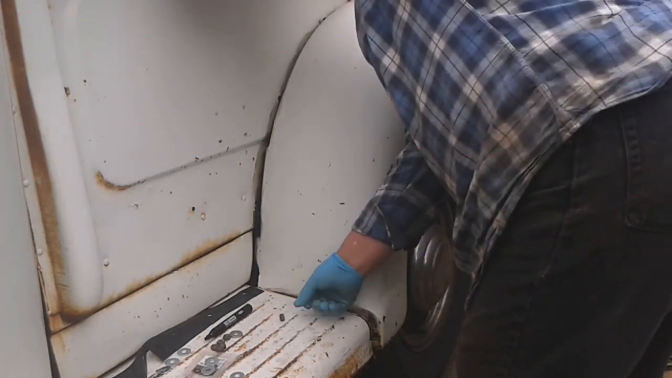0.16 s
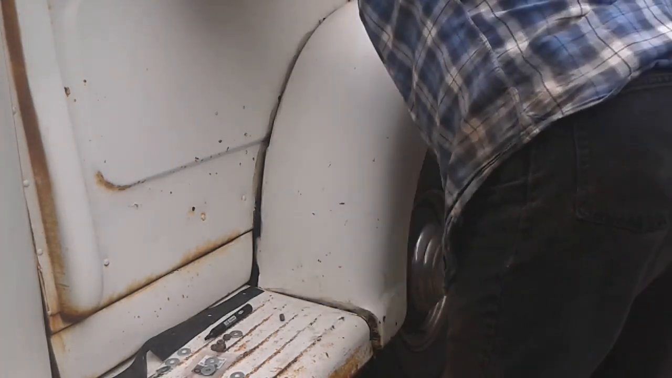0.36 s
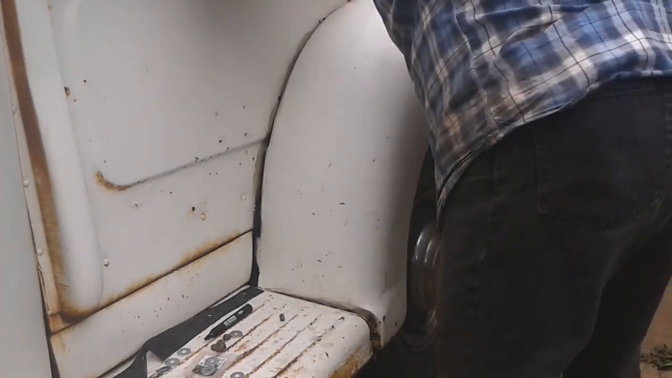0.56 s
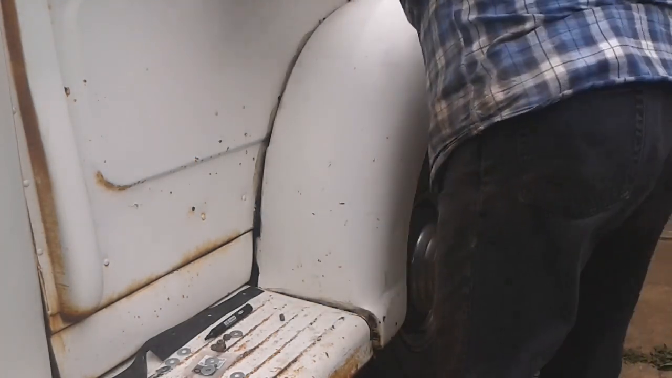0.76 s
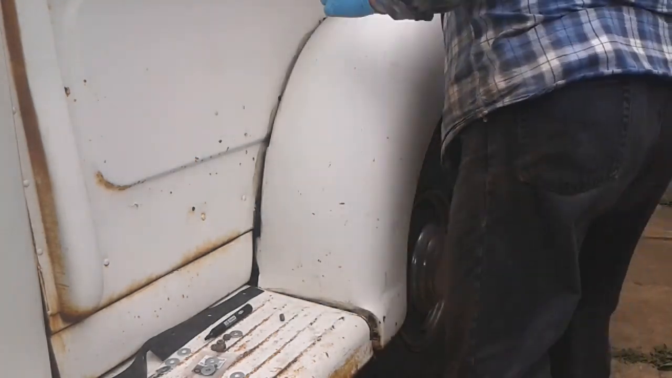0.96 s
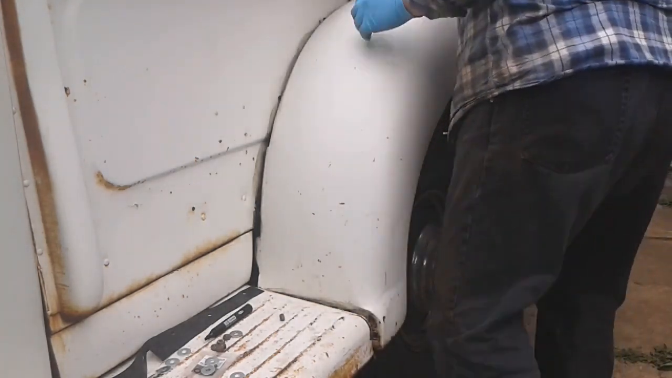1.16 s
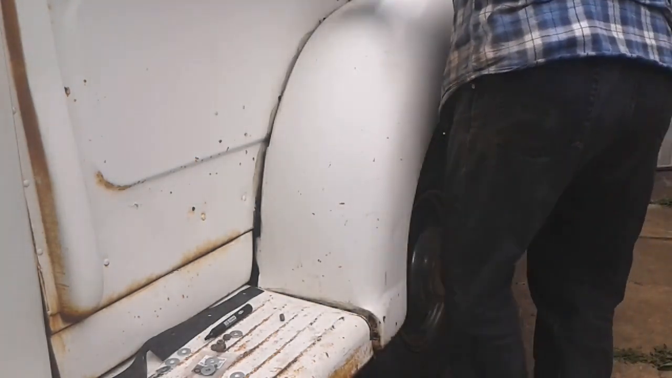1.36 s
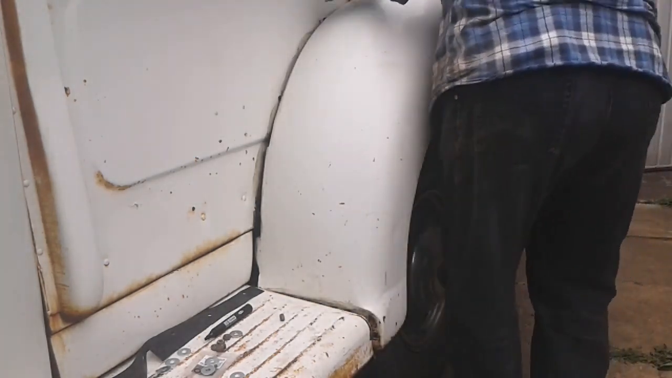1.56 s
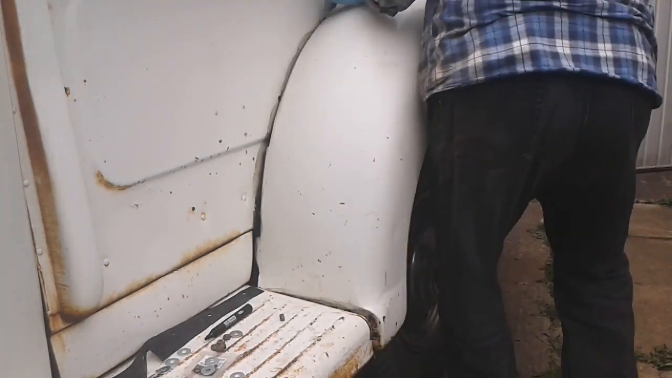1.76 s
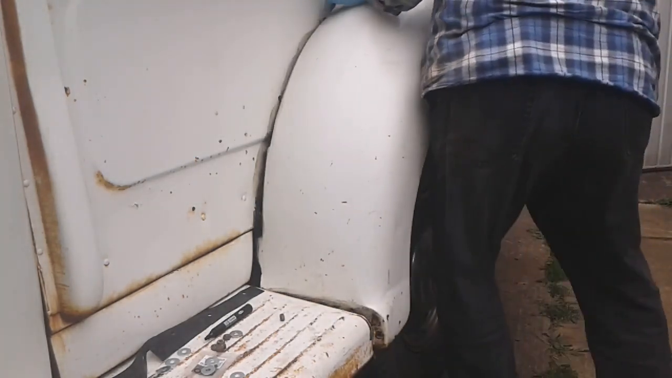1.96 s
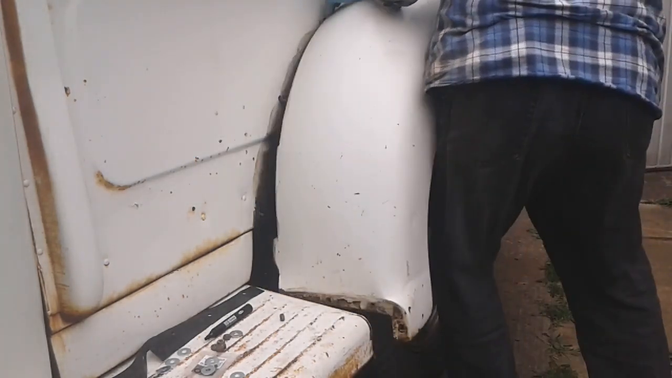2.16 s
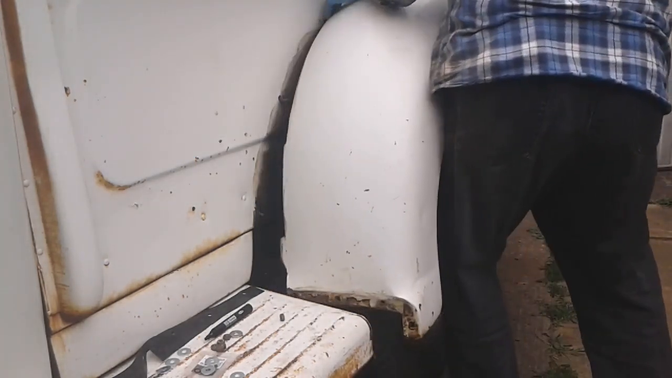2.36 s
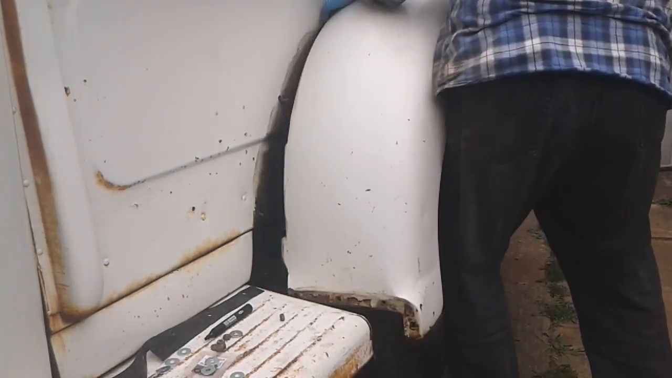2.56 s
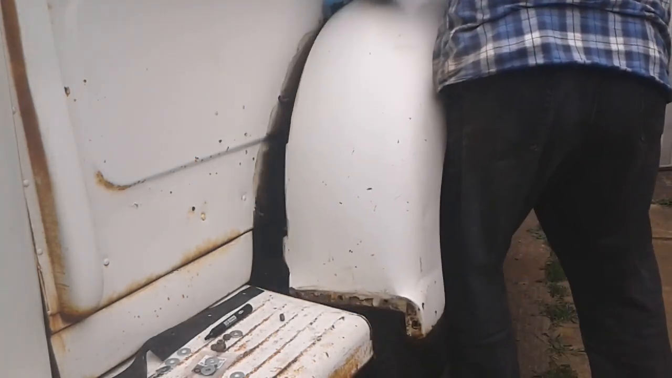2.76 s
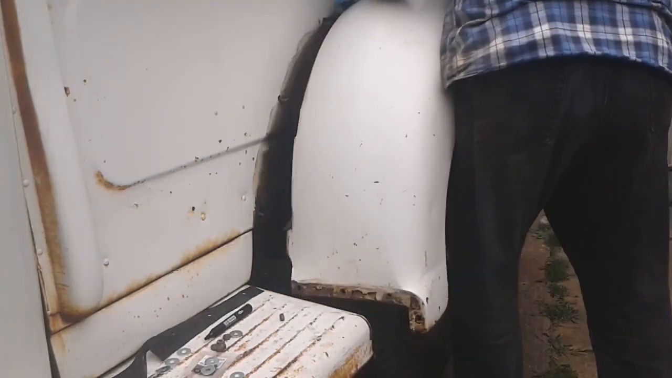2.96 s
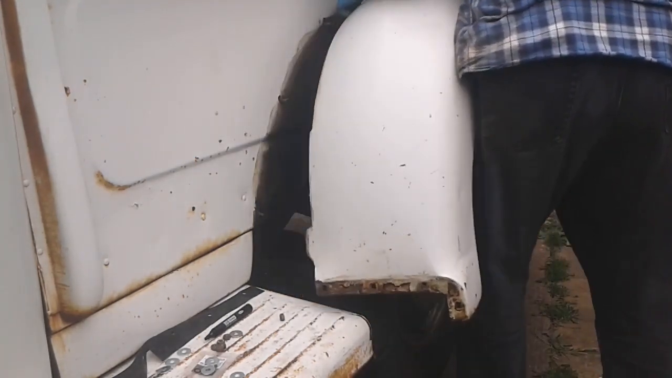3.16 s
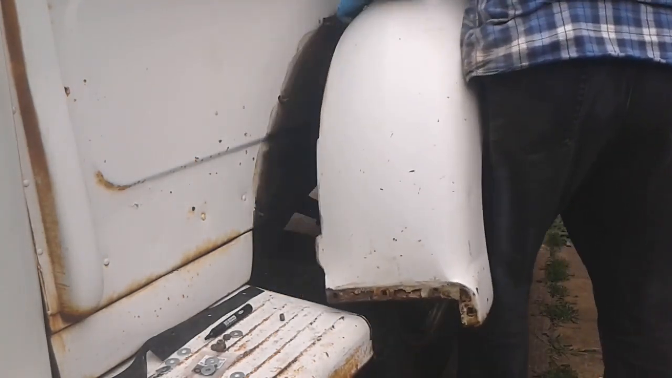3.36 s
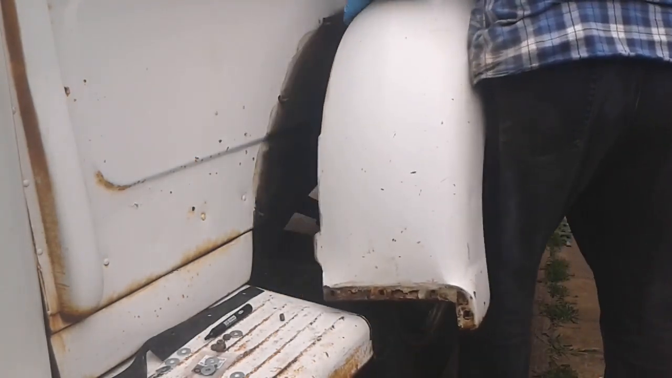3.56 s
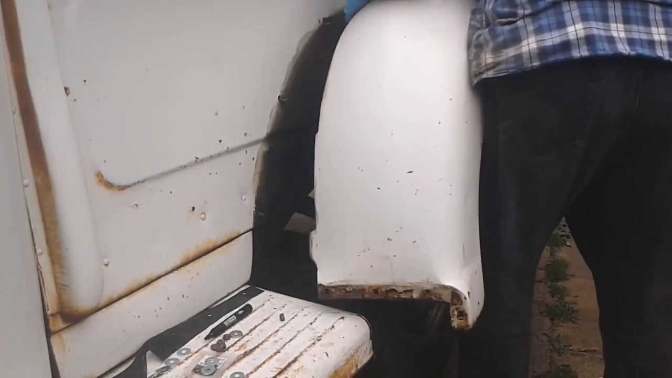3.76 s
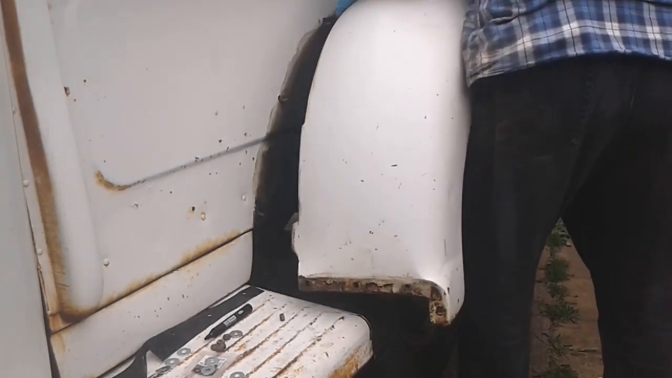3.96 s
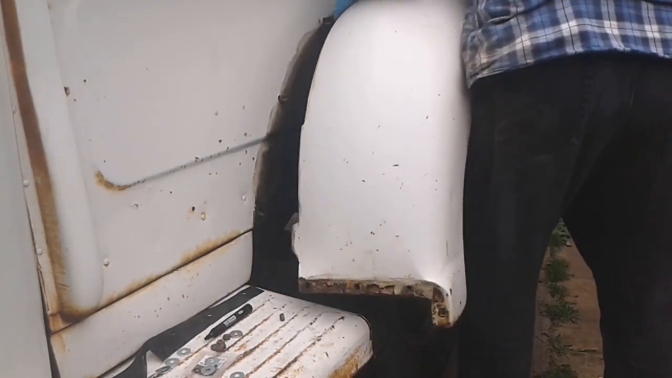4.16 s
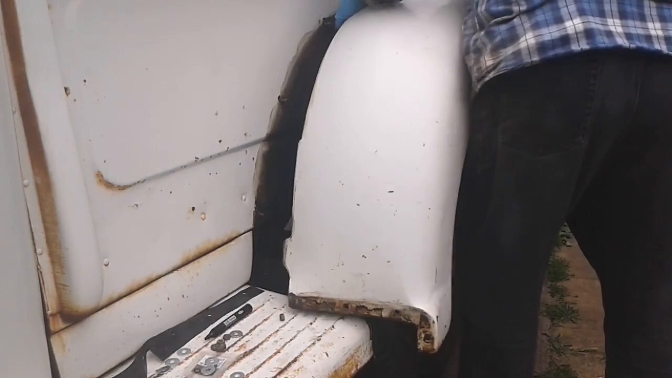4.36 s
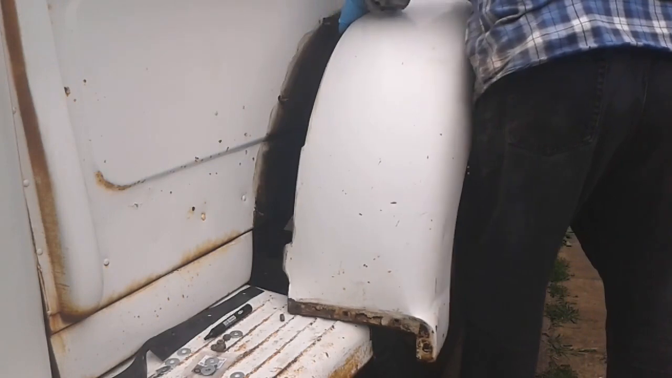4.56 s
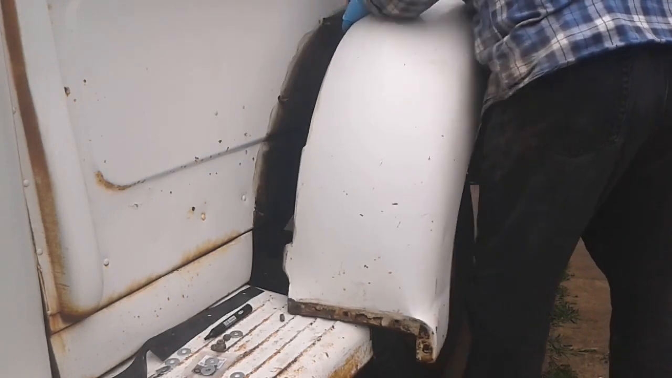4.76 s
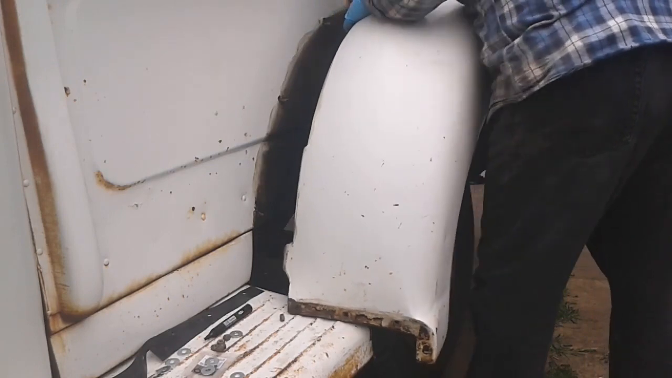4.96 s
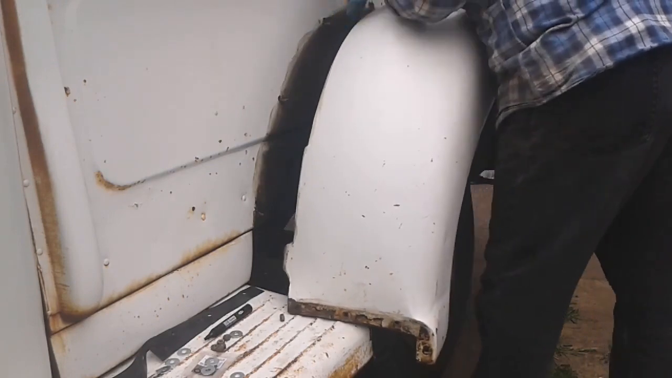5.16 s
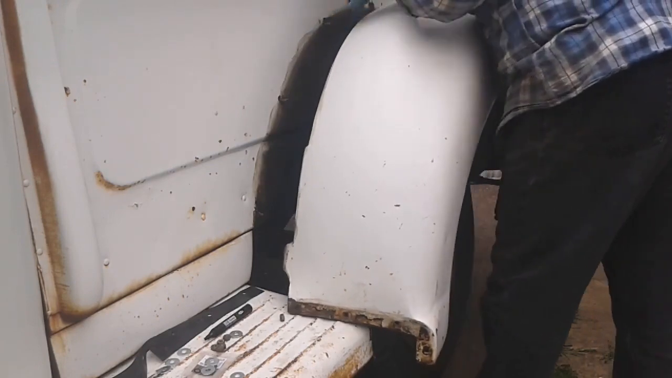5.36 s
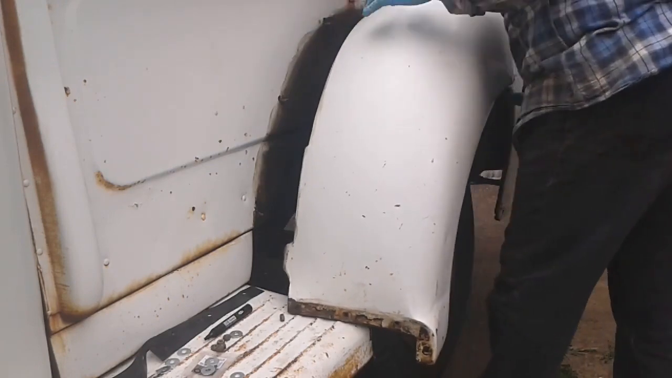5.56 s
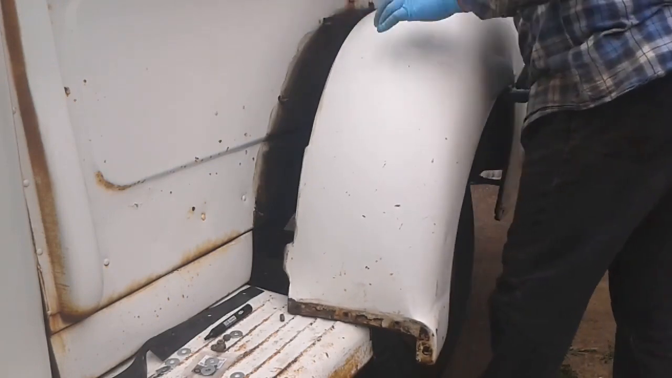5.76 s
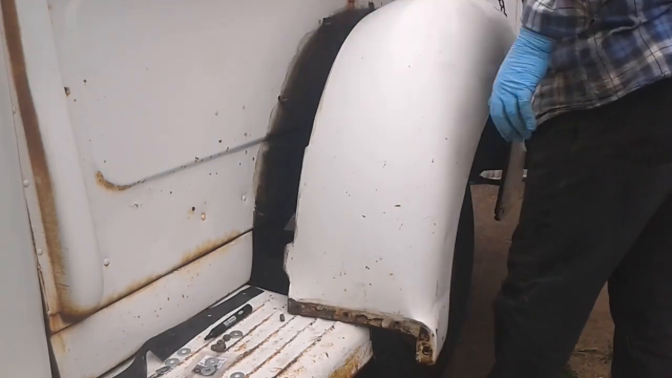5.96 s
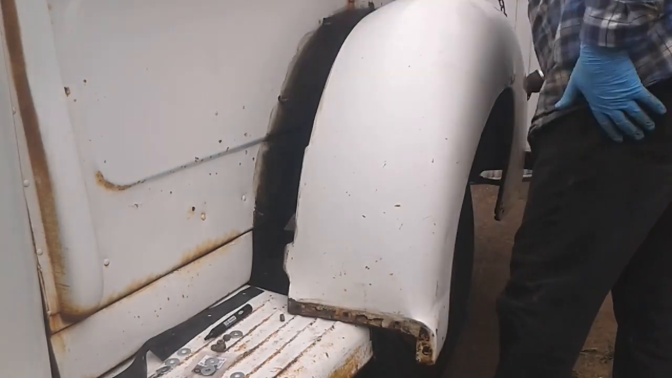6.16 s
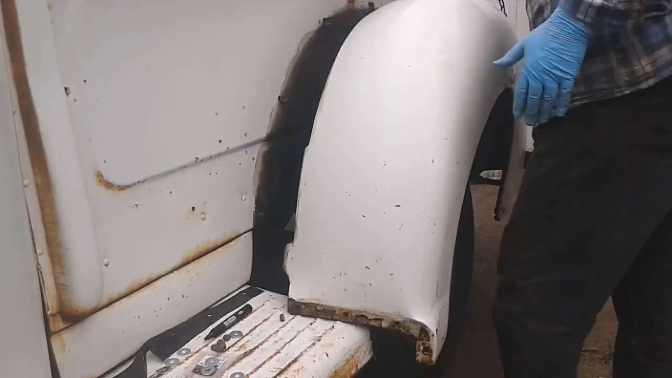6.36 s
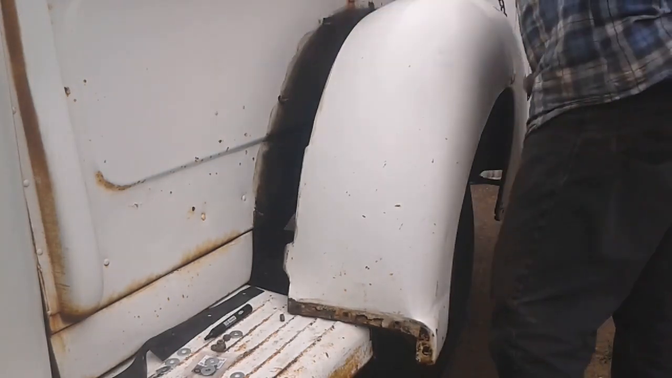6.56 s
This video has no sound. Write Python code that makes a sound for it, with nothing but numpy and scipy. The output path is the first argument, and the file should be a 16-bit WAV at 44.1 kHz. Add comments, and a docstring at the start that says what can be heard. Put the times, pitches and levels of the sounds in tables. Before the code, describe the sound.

Close microphone in a workshop with a faint diffuse echo, over a dull, gently swelling background, soft hiss and barely audible tones. A small metallic tick comes at the very start, then near quiet until about 1.9 s, when a steel edge gives low, nasal creaks. Scraping grows from 2.1 s into a hollow thump and rough groan at 2.2 s; short falling squeaks follow from 2.4 to 2.6 s. At 2.8-3.0 s another creak and scrape burst into a rapid cluster of heavy clanks, the loudest near 2.96 s, overloaded and ringing briefly. Small scrapes trail to 3.3 s. The background swells around 3.6 s. From 3.75 s gritty rust rubbing resumes in uneven shoves, with light knocks and brief groans around 4.2 s, ending in a moderate dull clunk at 4.53 s and a short scuff. After a barely audible tap near 4.9 s, only room noise continues to 6.6 s.

```python
"""In a workshop, heard from close by, a heavy steel fender is worked loose from a truck body.
Its edge groans in stick-slip (gliding harmonics) and scrapes over rust (bursts of tiny random slips),
breaks free with a loud clank (contact, chatter and thud through the fender's ringing modes),
is dragged along the body and set down on the running board. The room rings faintly in a diffuse tail
over a dull, swelling background, hiss and faint tones; the loudest clank overloads the input."""
import sys
import numpy as np
from scipy import signal
from scipy.fft import rfft, irfft, next_fast_len
from scipy.io import wavfile

SR = 44100
rng = np.random.default_rng(int(sys.argv[2]) if len(sys.argv) > 2 else 0)


def store_wav(level_fs):
    """Save 16-bit WAV to argv[1]."""
    pcm = np.round(np.clip(np.atleast_2d(level_fs), -1, 1) * 32767)
    wavfile.write(sys.argv[1], SR, pcm.T.astype(np.int16))


N = 292074
TIME = np.arange(N) / SR

# Spectrum of the workshop air: (frequency [Hz], relative level per Hz [dB])
AIR_SPECTRUM = [(15, -41.5), (25, -18), (70, -10), (102, -4.5), (222, -3.5), (371, -2), (1030, -10),
                (1820, -20.5), (2140, -19.5), (3380, -30), (12700, -32.5), (15700, -31.5)]
# Faint tones in the air: (mean frequency [Hz], level [dB])
AIR_TONES = [(96.9, -75.5), (247.6, -75.5), (1922, -85.5), (2105, -84), (2492, -83.5), (15375, -81)]
# Swells of the dull background: (time [s], width [s], level [dB])
AIR_SWELLS = [(.2, 0.54, -59.5), (1.45, 0.12, -58.5), (3.6, 0.49, -55), (5.0, 0.2, -55), (5.3, 0.35, -60.5),
              (6.38, 0.18, -59)]
CALM_DB = -61.5  # dull background between swells

# Blows of steel on steel: (time [s], level before the common gain [dB], hardness as a corner [Hz],
# thud re the blow [dB], thud pitch [factor], panel ring re the contact [dB])
STEEL_BLOWS = [(0.047, -44.5, 3680, 3, 1.8, 1), (2.183, -34.5, 1590, 1, 0.7, 2),
               (2.197, -23.5, 644, 5.5, 1.33, 4), (2.246, -22.5, 1488, -9, 0.72, 3),
               (2.881, -16.5, 1400, -0.5, 1.42, 1.5), (2.908, -12, 1550, -3, 1.3, 0),
               (2.95, -12.5, 1210, -11, 1.45, 2), (2.957, -4, 2906, -26, 0.35, -3.5),
               (2.975, -13, 1590, -15.5, 1.37, -2), (3.05, -22.5, 1530, -12, 0.95, 7),
               (3.273, -37.5, 1095, -7, 0.84, -2), (3.963, -32, 1070, -27, 1.4, 2),
               (4.262, -29.5, 3320, -12, 2.3, 3), (4.526, -24.5, 1260, -2, 1.12, -4),
               (4.534, -19.5, 1190, -8, 0.66, -1), (4.545, -26.5, 940, 0, 0.884, -1),
               (4.928, -48, 700, -7.5, 1.1, 2)]
# Spectrum that colours each blow: (frequency [Hz], relative level per Hz [dB])
CLANG_SPECTRUM = [(40, -38), (150, -19.5), (300, -2.5), (700, 6.5), (1500, 7.5), (2300, 1), (4000, -7.5),
                  (15000, 0.5)]
# Spectrum of the low thud at pitch factor 1: (frequency [Hz], relative level per Hz [dB])
THUD_SPECTRUM = [(25, -25), (70, -20), (130, -10.5), (250, 5), (550, -19.5), (1200, -63.5)]

# Strong modes of the fender: (frequency [Hz], relative level [dB])
FENDER_MODES = [(241, -7), (289, -3.5), (314, -3.5), (352, -2), (426, -6.5), (495, -8.5), (535, -4.5),
                (640, -10), (705, -1), (923, -8.5), (1027, -3), (1235, -13), (1295, 3.5), (1405, -10),
                (1462, 5.5), (1562, -5.5), (1750, -8), (2280, -2.5), (3800, -8), (4480, -10)]
MODES_DB = -10  # strong modes re the crowd of weaker ones, in a blow
# Decay of the crowded higher-order modes: (frequency [Hz], time to fall 60 dB [s])
PANEL_DECAY = [(100, 0.42), (1500, .135), (3000, 0.15), (8000, 0.056)]

# Groans of the edge: (time [s], length [s], first slip rate [Hz], glide [Hz per s],
# level before the common trim [dB], roughness [0-1], brightness [dB per octave above the slip rate])
EDGE_GROANS = [(1.863, 0.13, 448.4, -88, -33, 0.25, 3), (1.955, 0.073, 463.3, -5, -35.5, 0.4, 1.5),
               (1.973, 0.12, 416, -750, -46, 0.42, -6), (2.23, 0.08, 503, -450, -22, 0.58, 3),
               (2.404, 0.055, 607, -700, -37.5, 0.27, 0), (2.488, 0.065, 530.5, -300, -32, 0.25, -2),
               (2.528, 0.045, 513.6, -1300, -24.5, 0.16, 5), (2.567, 0.036, 498, -100, -28.5, 0.26, 4.5),
               (2.552, 0.094, 441, -280, -33, .16, -4), (2.798, 0.067, 578, -2600, -30, 0.4, 5),
               (4.176, 0.051, 470.6, -1200, -30, 0.26, -7), (4.184, 0.033, 612, 1100, -24.5, 0, -18),
               (4.286, 0.053, 354.7, -200, -34.5, 0.16, -1.5), (4.464, 0.043, 490, -7, -33, 0.38, 4)]
GROAN_SKEW, GROAN_ARCH = 0.81, 0.97  # the grip tightens quickly and lets go more slowly
# How strongly the steel radiates each groan harmonic: (frequency [Hz], relative level [dB])
RADIATION = [(200, 0.5), (480, 8), (950, 0), (1400, 6), (1800, -7.5), (2600, -17.5), (3600, -34), (8000, -54.5)]

# Shoves that drag the edge over rust:
# (time [s], length [s], then before each layer's trim: scrape [dB], rasp [dB], grit [dB])
RUST_SHOVES = [(2.068, 0.054, -47, -70, -61.5), (2.119, 0.096, -35, -58, -51),
               (2.178, 0.028, -27, -47, -46), (2.212, 0.092, -29.5, -59, -70),
               (2.379, 0.027, -52, -68, -54), (2.852, 0.036, -23, -47, -40.5),
               (2.894, 0.077, -20.5, -45, -56), (3.047, 0.024, -29.5, -49, -49),
               (3.101, 0.043, -37.5, -54, -59), (3.167, 0.019, -30.5, -59, -51.5),
               (3.201, 0.032, -32, -51.5, -63), (3.748, .025, -43.5, -60, -57.5),
               (3.805, 0.044, -44.5, -58, -60), (3.838, 0.12, -41, -58, -53.5),
               (3.93, 0.044, -36, -48.5, -55), (4.007, 0.058, -42, -70, -60),
               (4.061, 0.047, -34, -40, -49.5), (4.097, 0.1, -31, -45.5, -49),
               (4.22, 0.054, -33.5, -56, -53.5), (4.264, 0.0077, -36, -49, -57),
               (4.293, 0.062, -44.5, -68, -81), (4.419, 0.063, -46.5, -68, -73),
               (4.468, 0.061, -33.5, -42.5, -52.5), (4.505, 0.051, -26.5, -42.5, -46.5),
               (4.563, .035, -31, -39, -57), (4.616, 0.018, -35, -59, -62),
               (4.671, 0.041, -51.5, -64.5, -64)]
# A shove bites, slowly loses pressure, then stops: the release adds to the sag
ATTACK_S, SAG_DB_PER_S, RELEASE_DB_PER_S = .02, 18.5, 502.5
# Spectrum of the scrape: (frequency [Hz], relative level per Hz [dB])
SCRAPE_SPECTRUM = [(60, -30.5), (200, -13), (330, -2.5), (600, 0.5), (850, -2), (1170, -6.5), (1480, -5),
                   (1850, -8.5), (2700, -12.5), (3800, -26.5), (5000, -43), (12000, -41)]
# Spectrum of the rasp: (frequency [Hz], relative level per Hz [dB])
RASP_SPECTRUM = [(1200, -29), (2400, 2.5), (3700, 0.5), (4200, -11), (4800, -15), (9000, -34.5)]
# Spectrum of the crushed grit: (frequency [Hz], relative level per Hz [dB])
GRIT_SPECTRUM = [(1500, -22), (3000, 14), (4000, 3.5), (4800, -3.5), (6500, 3), (8200, 5.5), (10000, -1.5),
                 (12500, -1.5), (15500, 1.5)]

# Decay of the room: (frequency [Hz], time to fall 60 dB [s])
ROOM_DECAY = [(80, 2), (260, 1.28), (700, 0.66), (1800, 0.36), (10000, 0.55)]
EDGE_HZ = 15850  # upper band limit


def amp(db):
    """Decibels to gain."""
    return 10 ** (np.asarray(db) / 20)


def evened(x):
    """Scales to rms 1."""
    return x / np.sqrt(np.mean(x ** 2) + 1e-20)


def unit(x):
    """Scales to energy 1."""
    return x / (np.linalg.norm(x) + 1e-20)


def read(points, hz):
    """Reads a table on a log-frequency axis."""
    f, value = np.transpose(points)
    return np.interp(np.log(hz + 1), np.log(f + 1), value)


def add(mix, s, sound):
    """Mixes a sound in at time s."""
    part = mix[max(round(s * SR), 0):][:len(sound)]
    part += sound[:len(part)]


def through(x, response):
    """Convolves and keeps the length."""
    return signal.fftconvolve(x, response)[:len(x)]


def colour(points, size=4096):
    """Causal, minimum-phase impulse response of a spectrum, energy 1."""
    level_db = read(points, abs(np.fft.fftfreq(size, 1 / SR)))
    log_gain = np.log(amp(np.maximum(level_db, -100)))
    spectrum = np.exp(np.conj(signal.hilbert(log_gain)))
    return unit(np.fft.ifft(spectrum).real[:size // 2])


def wander(hz):
    """Smooth chance of rms 1: noise whose spectrum fades out around a rate."""
    size = next_fast_len(N)
    f = np.fft.rfftfreq(size, 1 / SR)
    spectrum = rfft(rng.standard_normal(size)) * np.exp(-(f / hz) ** 2)
    return evened(irfft(spectrum, size)[:N])


def tail(t60s, count):
    """Dense ringing in which each band dies at its own speed."""
    hz, t, z = signal.stft(rng.standard_normal(count), SR, nperseg=256)
    t60 = np.maximum(read(t60s, hz), .01)[:, None]
    return unit(signal.istft(z * amp(-60 * t / t60), SR, nperseg=256)[1])


def air(steady_db=-60, waver_hz=4, flutter_db=1):
    """A dull swelling background over even hiss and faint tones of wavering pitch."""
    noise = evened(through(rng.standard_normal(N), colour(AIR_SPECTRUM)))
    dull_band = signal.butter(2, [130, 2200], "band", fs=SR, output="sos")
    dull = signal.sosfiltfilt(dull_band, noise)
    power = amp(CALM_DB) ** 2
    for s, width, db in AIR_SWELLS:
        power = power + amp(db) ** 2 * np.exp(-((TIME - s) / width) ** 2)
    swell = np.sqrt(power) * amp(flutter_db * wander(hz=7.1))
    tones = np.zeros(N)
    for hz, db in AIR_TONES:
        turns = np.cumsum(hz + waver_hz * wander(hz=25)) / SR
        tones += amp(db) * np.sqrt(2) * np.sin(2 * np.pi * turns)
    return swell * dull + amp(steady_db) * (noise - dull) + tones


def fender_response(modes_db, panel_db):
    """The contact itself, the strong modes and a crowd of weaker ones that differs from spot to spot."""
    t = np.arange(SR // 3) / SR
    t60_at_1khz = .19  # s
    modes = np.zeros(len(t))
    for hz, db in FENDER_MODES:
        decay = np.exp(-np.log(1000) * t / t60_at_1khz * np.sqrt(hz / 1000))  # high modes die sooner
        modes += amp(db) * decay * np.cos(2 * np.pi * hz * t)
    crowd = tail(PANEL_DECAY, count=len(t))[:len(t)]
    response = amp(panel_db) * crowd + amp(modes_db) * unit(modes)
    response[0] += 1  # the contact
    return unit(response)


def blows(level_db=23, chatter_db=0, chatter_s=0.002, contact=.7):
    """Each blow is a sharp contact, a short chatter of the loose edge and a low thud."""
    out, t = np.zeros(N), np.arange(SR // 3) / SR
    clang_tone = colour(CLANG_SPECTRUM)
    for s, db, corner_hz, thud_db, pitch, ring_db in STEEL_BLOWS:
        chatter = rng.standard_normal(len(t)) * np.exp(-t / chatter_s)
        force = amp(chatter_db) * unit(chatter)
        force[0] += contact
        softness = signal.butter(2, min(corner_hz, SR / 4), fs=SR)
        force = signal.lfilter(*softness, force)  # soft contacts lack treble
        ring = through(force, fender_response(modes_db=ring_db + MODES_DB, panel_db=ring_db))
        thud_tone = colour(np.array(THUD_SPECTRUM) * [pitch, 1])  # wider parts of the panel boom lower
        clang = unit(through(ring, clang_tone))
        thud = amp(thud_db) * unit(through(ring, thud_tone))
        add(out, s, amp(db + level_db) * (clang + thud))
    return out


def grains(per_s, spread_db):
    """Tiny slips at random moments, a few larger than the rest."""
    size = amp(spread_db * np.minimum(rng.exponential(1, N), 4))
    happens = rng.random(N) < per_s / SR
    return evened(size * rng.choice([-1, 1], N) * happens)


def groans(rasp_share=1.0, direct_db=-1, grit_db=-50):
    """Stick-slip pulses glide under one arch of grip; an uneven grip jitters their rate and adds rasp."""
    unsteady = .2 * wander(hz=260)
    ring_share = .24
    slips = grains(per_s=4100, spread_db=7.0)
    rasp = evened(through(slips, colour(SCRAPE_SPECTRUM)))
    rasp = rasp + amp(grit_db) * through(slips, colour(GRIT_SPECTRUM))
    out, k = np.zeros(N), np.arange(1, 17)[:, None]  # k: harmonic numbers
    for start, length, first_hz, glide, db, rough, bright in EDGE_GROANS:
        t = np.arange(0, length, 1 / SR)
        at = round(start * SR) + np.arange(len(t))
        hz = first_hz + glide * t
        grip = abs(np.sin(np.pi * (t / length) ** GROAN_SKEW)) ** GROAN_ARCH
        turns = np.cumsum(hz * (1 + rough * unsteady[at])) / SR
        weight = amp(read(RADIATION, k * hz) + bright * np.log2(k))
        lag = rng.random(k.shape)  # bending waves disperse, so each harmonic arrives in its own phase
        harmonics = weight * np.cos(2 * np.pi * (k * turns + lag))
        pulses = harmonics.sum(0) / np.sqrt((weight ** 2).sum(0) / 2)
        share = np.clip(rasp_share * rough, 0, 1)
        blend = np.sqrt(1 - share ** 2) * pulses + share * rasp[at]
        groan = amp(db + direct_db) * grip * blend
        add(out, start, groan)
        # The jammed edge damps the ring; the contact sample is left out
        body = fender_response(modes_db=-14.5, panel_db=0.5)[1:]
        add(out, start, ring_share * signal.fftconvolve(groan, body))
    return out


def pressure(t, length):
    """Smooth attack, sagging hold and release of one shove."""
    attack = np.sin(np.pi / 2 * np.minimum(t / ATTACK_S, 1)) ** 2
    return attack * amp(-SAG_DB_PER_S * t - RELEASE_DB_PER_S * np.maximum(t - length, 0))


def scrape(level_db=-2, rasp_db=-2, grit_db=-1, catch_db=2.0):
    """The edge catches on rust: slips ring the panel, rasp and crush grit in clumps, each shove at a new spot."""
    judder = evened(amp(catch_db * wander(hz=89.9)))
    clumps = evened(amp(3 * wander(hz=160)))
    slips = judder * grains(per_s=2500, spread_db=1.0)
    crumbs = judder * clumps * grains(per_s=10000, spread_db=3.0)
    layers = [(slips, colour(SCRAPE_SPECTRUM), level_db),
              (clumps * slips, colour(RASP_SPECTRUM), rasp_db),
              (crumbs, colour(GRIT_SPECTRUM), grit_db)]
    out, t = np.zeros(N), np.arange(SR // 2) / SR
    for start, length, *levels in RUST_SHOVES:
        body = fender_response(modes_db=-11.5, panel_db=-0.5)  # rubbing damps the modes
        push = pressure(t, length)
        for db, (drive, tone, layer_db) in zip(levels, layers):
            force = push * drive[round(start * SR):][:len(t)]
            add(out, start, amp(db + layer_db) * through(force, unit(through(body, tone))))
    return out


def workshop(x, wet_db=-14, build_s=0.0094):
    """The diffuse tail of the room, building up over the first reflections."""
    echo = tail(ROOM_DECAY, count=70000)
    echo *= 1 - np.exp(-np.arange(len(echo)) / SR / build_s)
    return x + amp(wet_db) * through(x, unit(echo))


def scene():
    """Every contact rings the same fender in the same room."""
    contacts = scrape() + groans() + blows()
    return (workshop(contacts) + air())[None]


def record(dry, lopsided=0.12):
    """The loudest clank overloads the input unevenly, which adds a low bump; then the band limit."""
    ceiling = .37  # full scale = 1
    bent = np.clip(dry + lopsided * dry ** 2, -ceiling, ceiling)
    band_limit = signal.firwin(511, EDGE_HZ, window=("kaiser", 9), fs=SR)
    return signal.oaconvolve(bent, band_limit[None], "same")


dry = scene()
out = record(dry)
store_wav(out)
```